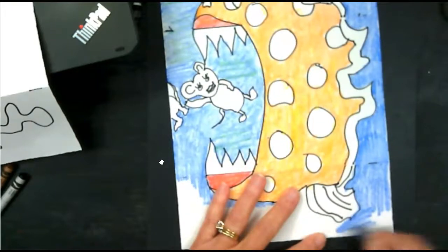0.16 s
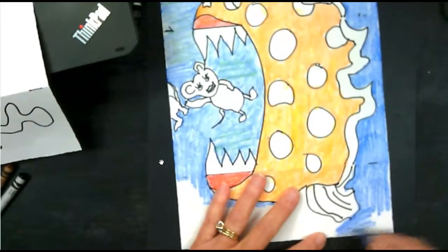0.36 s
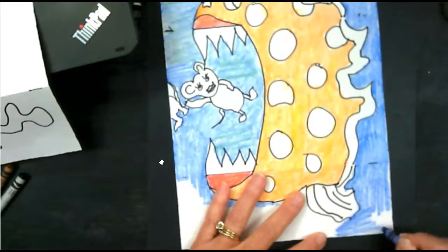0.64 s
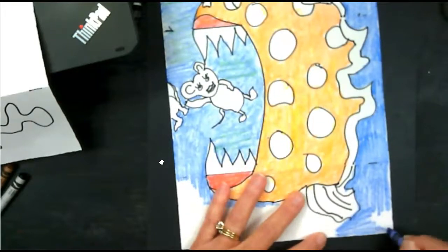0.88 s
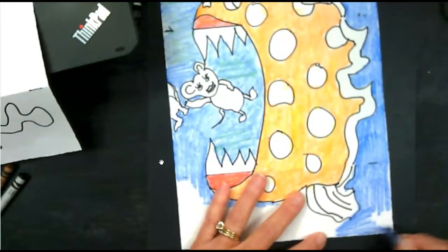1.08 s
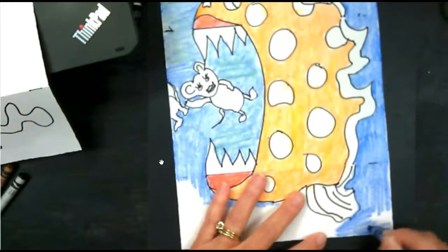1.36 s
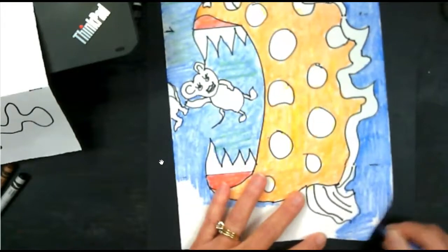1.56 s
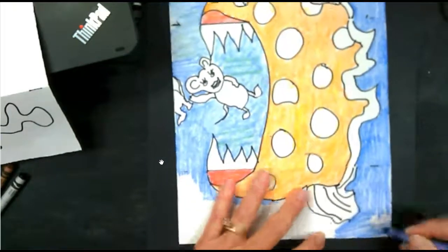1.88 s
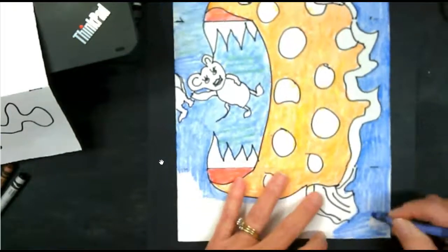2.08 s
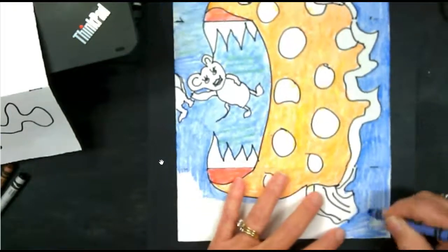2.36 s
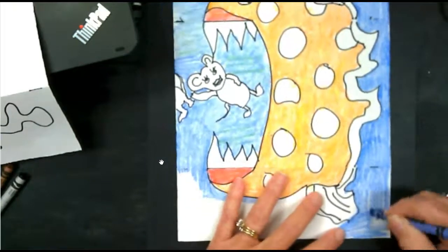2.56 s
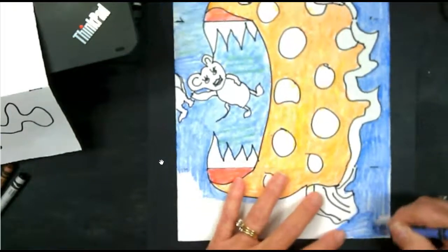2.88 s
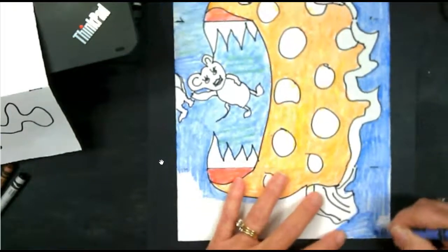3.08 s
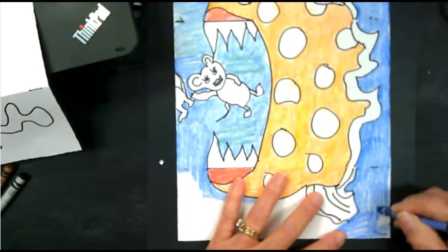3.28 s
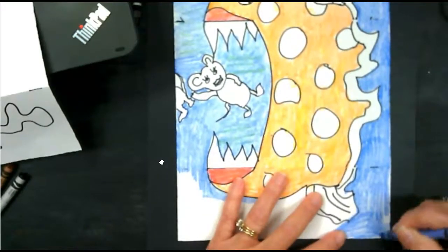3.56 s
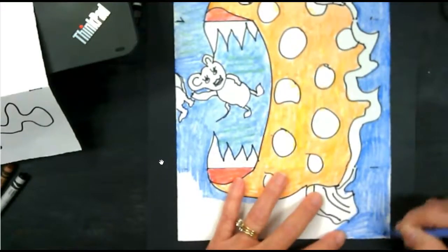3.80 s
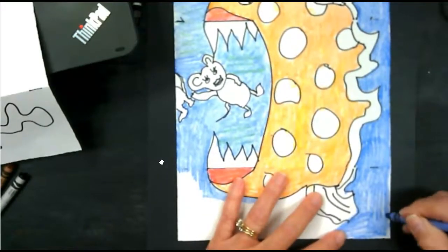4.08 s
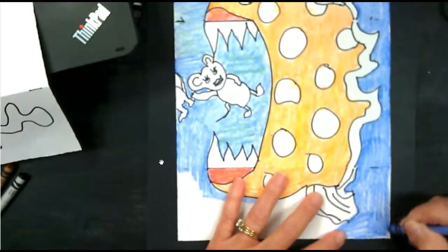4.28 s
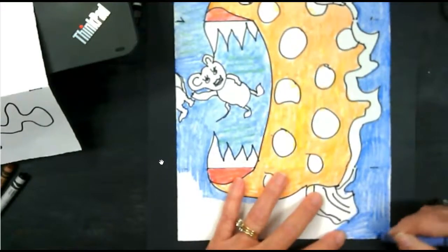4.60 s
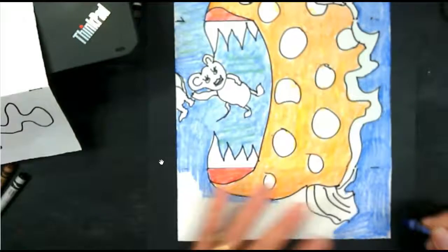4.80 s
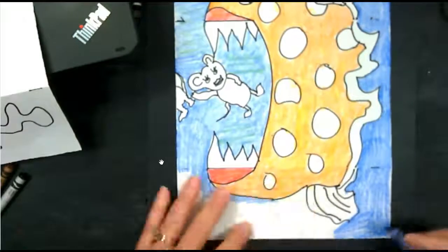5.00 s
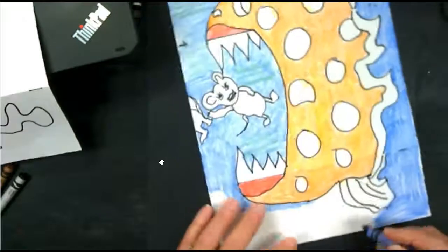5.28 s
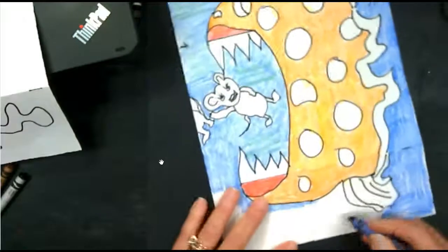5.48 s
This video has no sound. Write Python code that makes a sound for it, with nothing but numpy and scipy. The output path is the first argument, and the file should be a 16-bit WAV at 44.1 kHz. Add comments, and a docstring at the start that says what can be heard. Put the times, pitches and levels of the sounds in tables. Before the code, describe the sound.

Fast rubbing crayon strokes rumble through a desktop, rasp once over the paper edge, bump twice loudly, then stop before the sheet slides.

```python
"""Crayon scribbling on paper

A wax crayon scribbles back and forth along the edge of a sheet on a desk, about nine strokes a second.
Tiny random slips, passed through resonances, make its rumble in the desk top and its hiss on the paper.
Once it skids over the edge with a rasp; twice the desk is bumped, among softer knocks.
At the end the sheet is slid round. Mains hum and a faint hiss lie under it all."""
import sys
import numpy as np
from scipy import signal
from scipy.fft import rfft, irfft, next_fast_len
from scipy.io import wavfile
from scipy.ndimage import uniform_filter1d, map_coordinates

SR = 44100
rng = np.random.default_rng(int(sys.argv[2]) if len(sys.argv) > 2 else 0)


def persist_wave(psi):
    """Save psi, clipped to +-1, as 16-bit WAV."""
    counts = np.round(np.clip(psi, -1, 1) * 32767).astype(np.int16)
    wavfile.write(sys.argv[1], SR, np.atleast_2d(counts).T)


N = 248713  # length in samples

# The crayon turns round and starts a stroke; the levels are trimmed in crayon().
# Each row: start in seconds, desk rumble in dB, paper hiss in dB.
STROKE_STARTS = [(0.0, -65, -88.5), (0.137, -57, -86), (0.253, -68.5, -85), (0.401, -59, -88.5),
                 (0.525, -69.5, -86.5), (0.673, -63.5, -88.5), (0.78, -66, -87), (0.903, -51, -88),
                 (0.991, -66, -87.5), (1.103, -61, -93), (1.184, -66.5, -89.5), (1.302, -51.5, -87),
                 (1.386, -59.5, -85), (1.48, -49, -78), (1.559, -68, -78.5), (1.778, -84, -92.5),
                 (1.885, -87, -90), (1.967, -80, -91), (2.045, -76.5, -92.5), (2.181, -64.5, -85),
                 (2.267, -68, -86), (2.379, -71, -89.5), (2.485, -70.5, -90.5), (2.598, -70.5, -88),
                 (2.708, -71, -86.5), (2.818, -67.5, -85), (2.928, -72.5, -88), (3.038, -68, -86),
                 (3.147, -70.5, -86.5), (3.262, -66, -84), (3.365, -70, -85), (3.476, -67.5, -83.5),
                 (3.578, -69.5, -87.5), (3.69, -66, -84.5), (3.79, -73, -87.5), (3.903, -66, -85.5),
                 (4.015, -73, -88), (4.138, -70, -87.5), (4.25, -68, -91.5), (4.365, -52, -89.5),
                 (4.486, -61, -99), (4.62, -74, -91.5), (4.75, -80, -99), (5.561, -85, -91.5)]
# How loud the desk's upper resonances are against its low ones, before the effect of force.
# Each row: time in seconds, level in dB.
UPPER_RUMBLE = [(0, -7.5), (.135, -2), (.55, 0.5), (.85, -5.5), (1.35, -3), (1.55, -12), (2.2, -8.5),
                (3.75, -8.5), (4.3, -12.5), (4.5, -24.5), (4.62, -6.5)]
# The wax catches in mid-stroke and shakes the desk; the levels are trimmed in crayon().
# Each row: time in seconds, low rumble in dB, upper rumble in dB.
WAX_CATCHES = [(0.167, -57.5, -53.5), (.432, -50.5, -66), (.474, -69, -53), (.64, -70, -61.5),
               (.705, -67, -65), (.845, -60.5, -79), (1.143, -56.5, -60), (3.325, -59.5, -79),
               (3.75, -72, -72.5)]
# Low resonances of the desk top. Each row: pitch in Hz, width in Hz, relative level in dB.
DESK_LOW_MODES = [(431, 90, -17.5), (556.6, 55, -6), (662.8, 30, 1), (739, 34, -3.5), (838, 54, -10)]
# Upper resonances of the desk top. Each row: pitch in Hz, width in Hz, relative level in dB.
DESK_HIGH_MODES = [(972, 27, -4), (1086, 42, -0.5), (1150.4, 46, 1)]
# Peaks that colour the hiss and the brighter rub. Each row: pitch in Hz, width in Hz, relative level in dB.
HISS_PEAKS = [(1630, 230, 0), (2362, 340, -0.5), (3670, 650, -10), (5224, 300, 4), (5890, 450, -3),
              (7720, 1100, -6.5), (9570, 980, -13.5), (11040, 600, -8)]
# The sheet itself, broad and dull. Each row: pitch in Hz, width in Hz, relative level in dB.
SCUFF_MODES = [(543, 770, 0)]
# Skids over the sheet's edge. Each row: hardest moment in seconds, building time in seconds,
# fading time in seconds, rasp in dB, edge ring in dB, squeak in dB.
EDGE_SKIDS = [(1.354, 0.0029, 0.0052, -92, -100, -78.5), (1.505, 0.033, .02, -86, -77.5, -80),
              (1.521, 0.016, 0.024, -57.5, -51, -59), (1.540, 0.014, .021, -57.5, -54, -76),
              (1.594, 0.0062, 0.0093, -75, -68, -92), (1.619, 0.0034, 0.032, -79, -66.5, -91)]
# Rasp of the edge. Each row: pitch in Hz, width in Hz, relative level in dB.
RASP_MODES = [(2450, 530, -2), (2900, 106, 8), (5170, 470, -13), (5850, 520, -13.5), (7700, 2200, -21.5),
              (9700, 590, -29), (10800, 700, -21.5)]
# Ring of the edge. Each row: pitch in Hz, width in Hz, relative level in dB.
EDGE_MODES = [(3590, 200, 5.5), (4030, 190, -7)]
# Squeak of the wax. Each row: pitch in Hz, width in Hz, relative level in dB.
SQUEAK_TONES = [(7760, 66, -7.5), (12800, 140, -17), (13900, 130, -27)]
# The sheet slides on the desk. Each row: fastest moment in seconds, speeding up in seconds,
# slowing down in seconds, swish in dB, desk rumble in dB, whistle in dB.
SHEET_SLIDES = [(5.028, 0.029, .04, -86, -81, -100), (5.027, 0.0026, 0.008, -77, -75.5, -100),
                (5.048, 0.0036, 0.0081, -82, -75, -100), (5.165, 0.2, .16, -78, -78, -91.5),
                (5.148, 0.055, 0.041, -94, -101, -74.5), (5.447, 0.011, 0.11, -83.5, -83.5, -100)]
# Swish of the sheet. Each row: pitch in Hz, width in Hz, relative level in dB.
SWISH_MODES = [(2370, 1000, -5), (3650, 310, -1), (5240, 470, 4.5), (6000, 570, -5), (7670, 1300, -5),
               (9640, 640, -4.5), (11100, 800, -6), (13500, 2800, -20)]
# Whistle of the sheet. Each row: pitch in Hz, width in Hz, relative level in dB.
WHISTLE_TONES = [(2360, 41, -2.4), (4020, 45, 0.38)]
# Knocks on the desk. Each row: start in seconds, peak of the ring in dB,
# dull thud in dB relative to the ring.
DESK_KNOCKS = [(.682, -53.5, -8), (1.458, -50, -1.5), (1.495, -54, -2.5), (1.622, -60.5, 7.5),
               (2.095, -60.5, 5.5), (2.820, -62, -5), (3.024, -55.5, 0), (4.114, -55, 0),
               (4.404, -48.5, -26), (4.421, -41.5, -16), (4.4435, -28, -20.5), (4.5534, -27.5, -19.5),
               (5.028, -59.5, 7)]
# What a knock rings with. Each row: pitch in Hz, swell time in seconds,
# time to die away by 60 dB in seconds, relative level in dB.
KNOCK_RING = [(409, 0.0026, 0.033, -5.5), (556.3, 0.0026, 0.032, -1), (668.4, 0.0085, 0.053, -2),
              (756, 0.0074, 0.032, -7.5), (1123, 0.0044, 0.042, -20), (1407, 0.00415, 0.025, -37),
              (2410, 0.0032, 0.047, -51.5)]
# Overtones of the hum. Each row: multiple of the mains frequency, relative level in dB.
HUM_OVERTONES = [(1, 0), (2, -17.5), (3, -39), (4, -34.5)]
# The hum dips briefly. Each row: deepest moment in seconds, length in seconds.
HUM_DIP_TIMES = [(0.118, 0.24), (0.524, 0.29), (1.104, .08), (1.31, 0.074), (1.425, .08), (1.559, .11),
                 (1.65, .12), (1.894, 0.088), (2.365, .28), (2.782, 0.27), (3.391, 0.18), (3.725, 0.077),
                 (3.933, 0.087), (4.054, 0.088), (4.236, .09), (4.312, 0.072), (4.658, .28), (5.106, .19)]
# Shape of the steady background. Each row: frequency in Hz, relative level in dB per Hz.
AIR_SPECTRUM = [(15, -4.5), (35, -1.5), (90, -11.5), (160, -14.5), (300, -24.5), (520, -30.5), (680, -32.5),
                (1000, -38.5), (1400, -44), (3000, -49), (10000, -50.5), (12500, -50.5), (13700, -45.5),
                (14600, -53.5), (15500, -53.5)]
# Faint electrical whine. Each row: pitch in Hz, width in Hz, relative level in dB.
WHINE_MODES = [(4400, 220, -6.5), (8160, 13, 2), (10760, 25, -10.5), (12800, 60, -22.5)]

LONGEST_STROKE_S = 0.13  # a stroke lasts until the next turn, but no longer than this before overlap
OVERLAP_S = 0.014  # the wax still drags this far into the neighbouring strokes
CREST_SHARE = 0.53  # how far through a stroke the hand is fastest
BRIGHTEN_DB_PER_DB, USUAL_RUMBLE_DB = 0.1682, -69.5  # a harder stroke is brighter than a usual one
CATCH_S = 0.035  # a catch builds this long and lets go as long
MAINS_HZ, HUM_DB = 60.015, -47.5  # hum level between dips
DIP_DB, USUAL_DIP_S = 9, 0.2  # depth and length of a usual dip
TOP_HZ = 15700  # the recorder's band limit


def amp(db):
    """Turn decibels into gain."""
    return 10 ** (np.asarray(db) / 20)


def unit(x):
    """Scale to rms 1."""
    return x / np.sqrt(np.mean(x ** 2) + 1e-20)


def clock():
    """The time of every sample, in seconds."""
    return np.arange(N) / SR


def wobble(rate):
    """A smooth curve through random points, rate of them a second."""
    points = rng.standard_normal(int(N * rate / SR) + 4)
    return map_coordinates(points, [clock() * rate])


def filtered(x, response):
    """Multiply the spectrum of x by a response that depends on frequency."""
    size = next_fast_len(N + SR // 2)
    hz = np.fft.rfftfreq(size, 1 / SR)
    return irfft(rfft(x, size) * response(hz), size)[:N]


def resonate(x, modes, low_hz, high_hz, order=1):
    """Let x ring a bank of resonances (order 2: steeper flanks) between two limits, at rms 1."""
    def bank(f):
        total = 0
        for k, (center, width, db) in enumerate(modes):
            peak = 1j * f * width / (center ** 2 - f ** 2 + 1j * f * width)
            total = total + (-1) ** k * amp(db) * peak ** order  # neighbours have opposite signs
        return total

    limits = signal.butter(6, [low_hz, high_hz], "band", fs=SR, output="sos")
    return unit(signal.sosfilt(limits, filtered(x, bank)))


def friction(rate, clump_db, clump_rate):
    """Tiny slips on a rough surface, about rate a second, in uneven clumps."""
    slips = rng.standard_normal(N) * (rng.random(N) < rate / SR)
    return slips * amp(clump_db * wobble(clump_rate))


def squeal(lines, rough_db):
    """Self-sustained friction tones, at rms 1: each tone's phase drifts as its width says."""
    total = 0
    for hz, width, db in lines:
        drift = np.cumsum(rng.standard_normal(N)) * np.sqrt(2 * np.pi * width / SR)
        phase = 2 * np.pi * hz * clock() + uniform_filter1d(drift, size=96)
        total = total + amp(db + rough_db * wobble(200)) * np.sin(phase)
    return unit(total)


def sweeps(rows, sharpness, lag=0):
    """One gain curve per level column: each move speeds up from rest and stops again."""
    t, gains = clock() - lag, 0
    for crest, rise, fall, *levels in rows:
        progress = np.interp(t - crest, [-rise, 0, fall], [0, 0.5, 1])
        speed = np.abs(np.sin(np.pi * progress))
        gains = gains + amp(levels)[:, None] * speed ** sharpness
    return gains


def crayon():
    """Each stroke's slips shake the desk top and hiss on the paper; catching wax adds rumble."""
    moves = strokes()
    catches = [(s, CATCH_S, CATCH_S, *levels) for s, *levels in WAX_CATCHES]
    catch_low, catch_high = sweeps(catches, sharpness=1.5)
    low = np.hypot(sweeps(moves, sharpness=2.17)[0], catch_low)
    high = np.hypot(sweeps(moves, sharpness=2.36, lag=0.002)[1], catch_high)
    hiss = sweeps(moves, sharpness=3.2, lag=-0.004)[2]  # slightly ahead of the rumble

    drag = friction(rate=2500, clump_db=1.0, clump_rate=140)
    sound = amp(-2.5) * low * resonate(drag, DESK_LOW_MODES, low_hz=342, high_hz=935)
    sound += amp(-2.5) * high * resonate(drag, DESK_HIGH_MODES, low_hz=898, high_hz=1242)
    sound += amp(-35) * high * resonate(drag, HISS_PEAKS, low_hz=1280, high_hz=1823)

    tooth = friction(rate=5400, clump_db=1.1, clump_rate=210)  # the paper's fine roughness
    sound += amp(9.5) * hiss * resonate(tooth, SCUFF_MODES, low_hz=264.5, high_hz=1231)
    sound += amp(2.0) * hiss * resonate(tooth, HISS_PEAKS, low_hz=1300, high_hz=13800, order=2)
    return sound


def strokes():
    """Hand moves: fastest, rise and fall in seconds; low rumble, upper rumble and hiss in dB."""
    start, rumble_db, hiss_db = np.transpose(STROKE_STARTS)
    until_next = np.diff(start, append=np.inf)
    length = np.minimum(until_next, LONGEST_STROKE_S) + 2 * OVERLAP_S
    rise = CREST_SHARE * length
    crest = start - OVERLAP_S + rise
    upper_db = rumble_db + np.interp(start, *np.transpose(UPPER_RUMBLE))
    upper_db += BRIGHTEN_DB_PER_DB * (rumble_db - USUAL_RUMBLE_DB)
    return np.transpose([crest, rise, length - rise, rumble_db, upper_db, hiss_db])


def skids():
    """The crayon judders over the edge of the sheet: a rasp, the edge's ring and a thin squeak."""
    rasp, ring, squeak = sweeps(EDGE_SKIDS, sharpness=1)
    judder = friction(rate=11000, clump_db=2.0, clump_rate=250)
    sound = rasp * resonate(judder, RASP_MODES, low_hz=1670, high_hz=13000, order=2)
    sound += ring * resonate(judder, EDGE_MODES, low_hz=2800, high_hz=4400, order=2)
    return sound + squeak * squeal(SQUEAK_TONES, rough_db=4.5)


def slides():
    """The sheet rubs over the desk as the hand turns it: a swish, a rumble and a brief whistle."""
    swish, rumble, whistle = sweeps(SHEET_SLIDES, sharpness=2.1)
    rub = friction(rate=10000, clump_db=0.3, clump_rate=76)
    desk_modes = [*DESK_LOW_MODES, *DESK_HIGH_MODES]
    sound = swish * resonate(rub, SWISH_MODES, low_hz=1750, high_hz=14100, order=2)
    sound += whistle * squeal(WHISTLE_TONES, rough_db=2)
    return sound + rumble * resonate(rub, desk_modes, low_hz=300, high_hz=1350)


def knocks():
    """Blows ring the desk's modes, which swell and die away, over a dull thud."""
    out = np.zeros(N + SR)
    t = np.arange(SR // 4) / SR

    def mode(hz, swell, t60):
        onset = 1 - np.exp(-(t / swell) ** 2)
        return np.sin(2 * np.pi * hz * (t - 0.006)) * onset * amp(-60 * t / t60)

    thud = mode(hz=214, swell=0.0039, t60=0.068)
    for s, db, thud_db in DESK_KNOCKS:
        ring = 0
        for hz, swell, t60, level in KNOCK_RING:
            varied_db = level + rng.normal(0, 1)  # no two knocks ring quite alike
            ring = ring + amp(varied_db) * mode(hz, swell, t60)
        blow = ring / np.abs(ring).max() + amp(thud_db) * thud
        out[round(s * SR):][:len(t)] += amp(db) * blow
    return out[:N]


def room(x, wall_db, tail_db, t60):
    """A near wall answers once, then a faint tail of scattered echoes dies away."""
    wall_delay = round(0.0121 * SR)
    wall = np.pad(x, (wall_delay, 0))[:N]
    t = np.arange(SR // 3) / SR
    tail = rng.standard_normal(len(t)) * amp(-60 * t / t60) * (t > 0.008)
    echoes = signal.fftconvolve(x, tail / np.linalg.norm(tail))[:N]
    return amp(wall_db) * wall + amp(tail_db) * echoes


def hum():
    """Mains hum and its overtones dip and recover together; longer dips go deeper."""
    t = clock()
    dips = 0
    for s, length in HUM_DIP_TIMES:
        shape = np.cos(np.pi * np.clip((t - s) / length, -0.5, 0.5)) ** 2
        dips = dips + np.sqrt(length / USUAL_DIP_S) * shape
    level_db = HUM_DB - DIP_DB * dips
    tones = 0
    for multiple, db in HUM_OVERTONES:
        cycles = multiple * MAINS_HZ * t + rng.random()
        tones = tones + amp(db) * np.sin(2 * np.pi * cycles)
    fade = np.clip(np.minimum(t, t[-1] - t) / 0.006, 0, 1)  # soft start and end
    return np.sqrt(2) * amp(level_db) * tones * fade  # root 2: a sine's peak over its rms


def background():
    """Room rumble and microphone hiss as shaped noise, and a thin electrical whine."""
    hz, db = np.transpose(AIR_SPECTRUM)

    def spectrum(f):
        return amp(np.interp(np.log(f + 1), np.log(hz), db))

    air = unit(filtered(rng.standard_normal(N), spectrum))
    whine = resonate(rng.standard_normal(N), WHINE_MODES, low_hz=3990, high_hz=14600)
    return amp(-65) * air + amp(-99) * whine


def scene():
    """Crayon, sheet and desk in the room, over the hum and background."""
    desk = crayon() + skids() + slides() + knocks()
    echoes = room(desk, wall_db=-14.5, tail_db=-18.5, t60=0.26)
    return (desk + echoes + hum() + background())[None]


def record(dry):
    """The recorder keeps nothing above its band limit."""
    return filtered(dry[0], lambda hz: hz < TOP_HZ)[None]


dry = scene()
out = record(dry)
persist_wave(out)
```